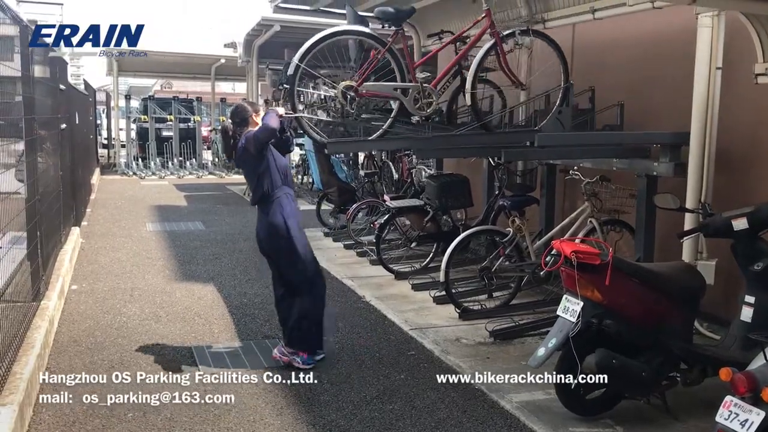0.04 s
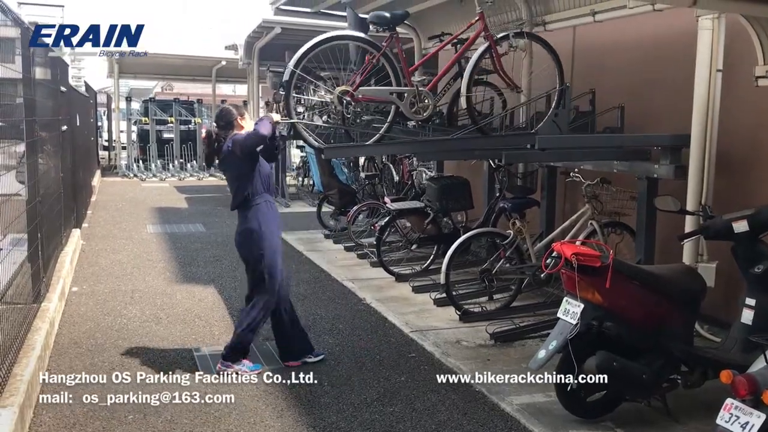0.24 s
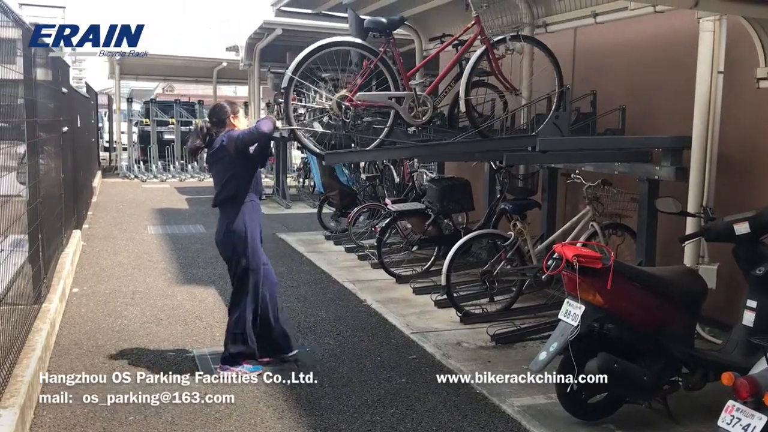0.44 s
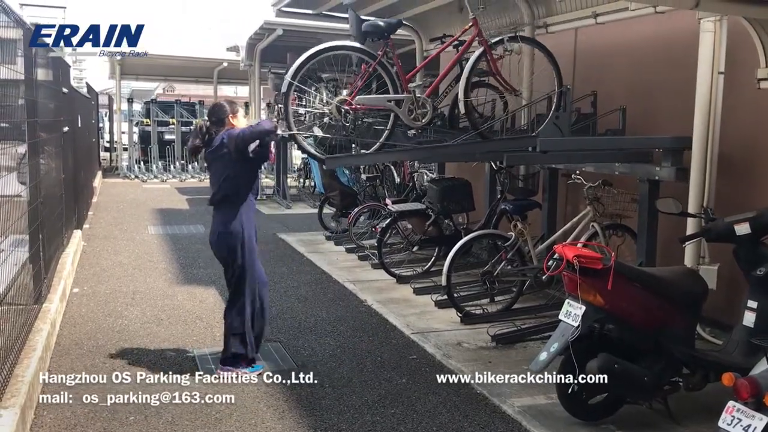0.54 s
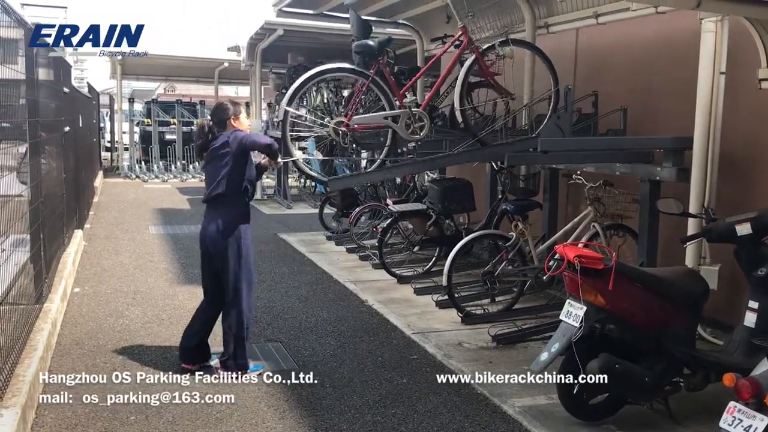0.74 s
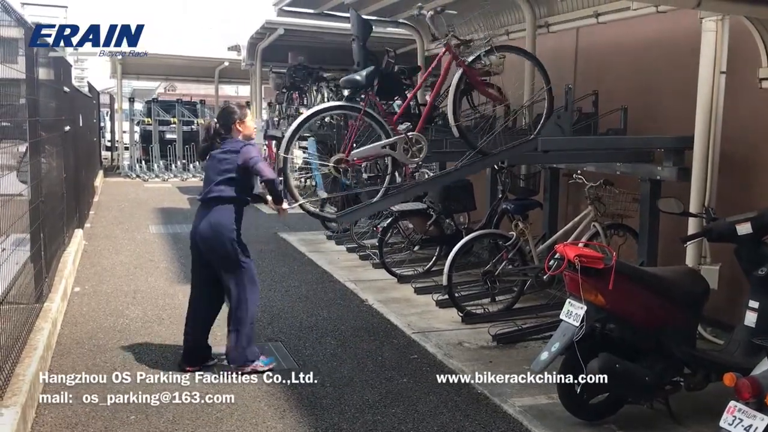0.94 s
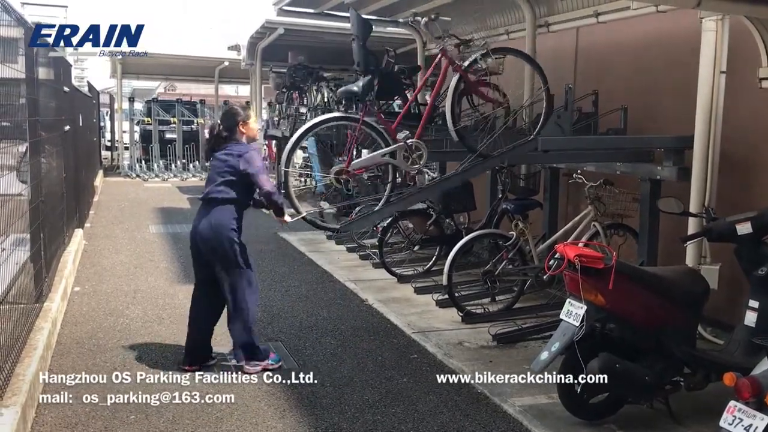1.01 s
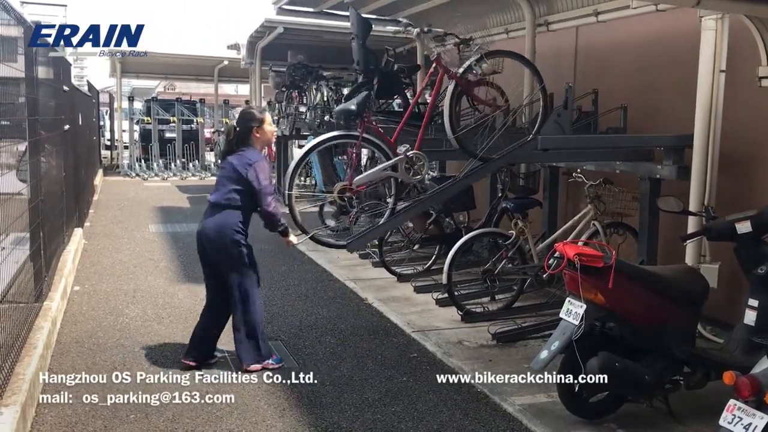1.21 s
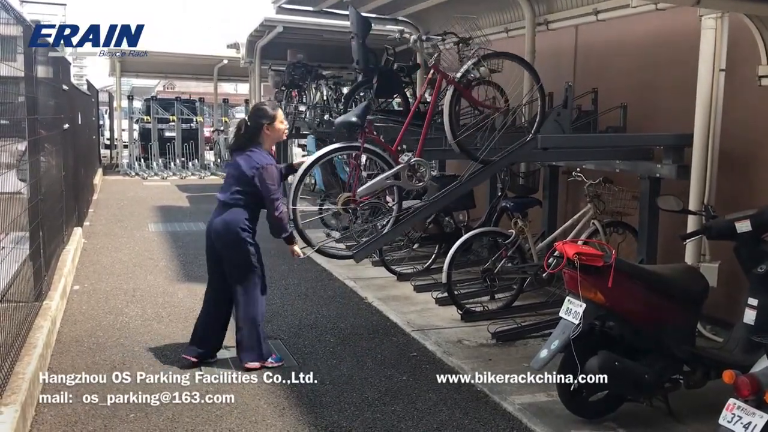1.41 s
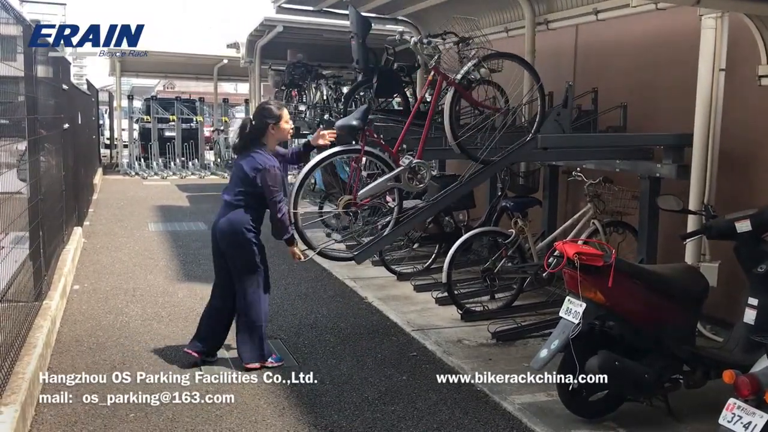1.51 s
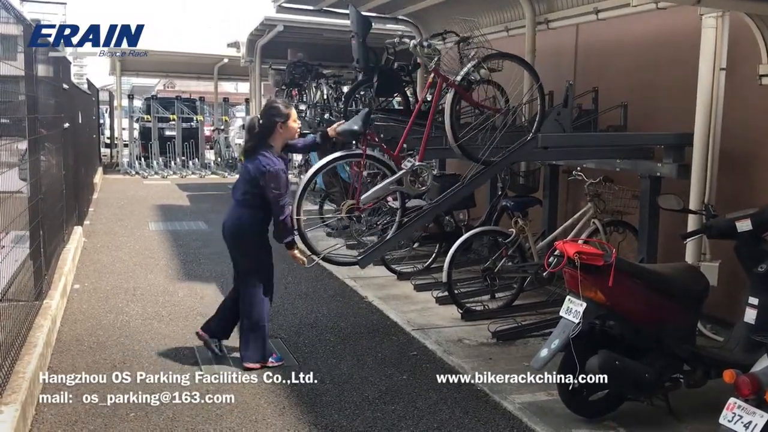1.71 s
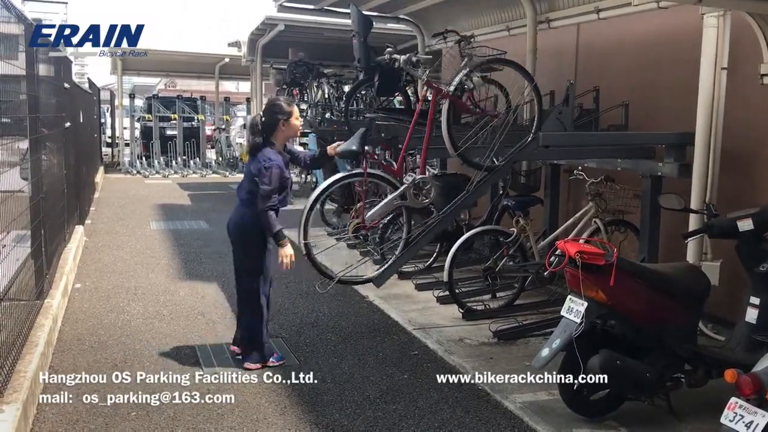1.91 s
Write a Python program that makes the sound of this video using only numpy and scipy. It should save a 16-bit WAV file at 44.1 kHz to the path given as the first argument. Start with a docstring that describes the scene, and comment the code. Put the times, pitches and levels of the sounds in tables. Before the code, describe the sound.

Loud metal clack and ringing rattle from a bicycle rack, followed by faint rolling and knocks.

```python
"""The upper tray of a steel bicycle rack slides out, hits its end stop with a loud clack and tilts down.
Its rollers grind along the rail; the blow and its rebounds set tray and bicycle rattling and ringing
under the shelter roof. Lighter knocks follow over a low town rumble. At the end a shoe scuffs the
gritty asphalt and something gives a thin squeak."""
import sys
import numpy as np
from scipy import signal
from scipy.fft import rfft, irfft
from scipy.io import wavfile
from scipy.ndimage import uniform_filter1d

SR = 44100
rng = np.random.default_rng(int(sys.argv[2]) if len(sys.argv) > 2 else 0)


def generate_wav(sig):
    """Save sig (samples, or channels by samples) to the path in sys.argv[1] as 16-bit PCM at SR."""
    pcm = np.round(np.clip(np.atleast_2d(sig).T, -1, 1) * 32767).astype(np.int16)
    wavfile.write(sys.argv[1], SR, pcm)


N = 85995
T = np.arange(N) / SR
HZ = np.fft.rfftfreq(N, 1 / SR)


def amp(db):
    """Decibels to gain."""
    return 10 ** (np.asarray(db) / 20)


def unit(x):
    """Scales to rms 1."""
    return x / np.sqrt(np.mean(x ** 2) + 1e-20)


def curve_at(points, hz):
    """Reads a curve on a log-frequency axis."""
    f, value = np.transpose(points)
    return np.interp(np.log(hz + 1), np.log(f + 1), value)


def colour(x, db):
    """EQ with a gain for each frequency, scaled to rms 1."""
    return unit(irfft(rfft(x) * amp(db), N))


def add(mix, s, sound):
    """Mixes a sound in at s seconds."""
    part = mix[max(round(s * SR), 0):]
    part += sound[:len(part)]


def drift(size):
    """Random wander smoothed over size points, rms 1."""
    return unit(uniform_filter1d(uniform_filter1d(rng.standard_normal(N), size), size))


def flat_noise():
    """Countless equally strong modes of random phase."""
    return unit(irfft(np.exp(2j * np.pi * rng.random(len(HZ))), N))


def die_away(x, t60s):
    """Lets each frequency decay at its own speed."""
    hz, t, spectra = signal.stft(x, SR, nperseg=256)
    decay = amp(-60 * t / curve_at(t60s, hz)[:, None])
    return signal.istft(spectra * decay, SR, nperseg=256)[1][:N]


def resonate(x, hz, width_hz):
    """Two resonators in series, both following the curve hz."""
    turn = np.exp(2j * np.pi * np.cumsum(hz) / SR)
    pole = np.exp(-np.pi * width_hz / SR)
    for _ in range(2):
        x = 2 * (turn * signal.lfilter([1 - pole], [1, -pole], x / turn)).real
    return x


# The town bed's tone. Each row: frequency in Hz, relative level in dB.
TOWN_EQ = [(20, -39), (35, -10.5), (62, 3), (110, 1), (180, -2), (220, -8.5), (400, -16.5), (650, -19),
           (1200, -24.5), (2300, -37.5), (3900, -31), (5200, -51), (7300, -42), (8400, -33), (10200, -48),
           (13500, -49), (16000, -44)]
# Hum and faint whine. Each row: pitch in Hz, level in dB.
MACHINE_TONES = [(180, -63), (266, -67.5), (6430, -87.5)]


def town(wash_db=-52, patchy_db=1.5, waver_hz=4):
    """Distant traffic rumbles and hisses in drifting patches; far machinery adds a wavering hum."""
    spectra = signal.stft(colour(flat_noise(), curve_at(TOWN_EQ, HZ)), nperseg=1024)[2]
    patches = unit(uniform_filter1d(uniform_filter1d(rng.standard_normal(spectra.shape), 10, 0), 10, 1))
    wash = unit(signal.istft(spectra * amp(patchy_db * patches), nperseg=1024)[1][:N])
    hum = np.zeros(N)
    for hz, db in MACHINE_TONES:
        pitch = hz + waver_hz * drift(size=2000)
        hum += amp(db) * np.sqrt(2) * np.sin(2 * np.pi * np.cumsum(pitch) / SR)
    return amp(wash_db) * wash + hum


# The rollers' fader ride. Each row: time in seconds, level in dB.
ROLLER_FADER = [(0, -57), (.06, -55), (.17, -59), (.23, -59), (.5, -61), (.85, -65), (1.0, -61),
                (1.13, -60), (1.24, -64.5), (1.52, -65.5), (1.95, -63.5)]
# The rail's tone. Each row: frequency in Hz, relative level in dB.
RAIL_EQ = [(150, -4.5), (500, 2.5), (1000, 2), (1800, -2.5), (3500, -9), (6000, -12.5), (10200, -22.5),
           (13000, -16), (16000, -29)]


def rollers(uneven_db=0.5):
    """Rollers grind unevenly along the rail."""
    grind = colour(flat_noise(), curve_at(RAIL_EQ, HZ))
    return grind * amp(np.interp(T, *np.transpose(ROLLER_FADER)) + uneven_db * drift(size=900))


def frame_resonances(ripple_db=1.7, cluster_db=4, width_hz=50):
    """The rack's uneven comb of resonances, in dB: they crowd around the tray's strongest modes."""
    clusters = np.max([np.exp(-.5 * ((HZ - hz) / width_hz) ** 2) for hz, _, _ in TRAY_MODES], axis=0)
    ripple = ripple_db * drift(size=90)[:len(HZ)]
    return (ripple + cluster_db * (clusters - .5)) * np.clip(HZ / 2500, 0, 1)  # flatter in the bass


# Knocks of latch, tray, bicycle and shoes.
# Each row: start in seconds, level in dB, centre in Hz, spread in octaves, T60 in seconds.
KNOCK_CUES = [(.074, -47, 854, 0.34, 0.17), (.074, -51, 3880, 0.92, 0.18), (0.074, -54, 4500, 0.037, 0.16),
              (.115, -52.5, 1490, 1.7, 0.48), (.158, -57.5, 6600, 0.83, 0.61),
              (0.23, -39, 13000, 0.45, 0.05), (0.2326, -25.5, 1095, 0.53, 0.063),
              (.755, -55.5, 1210, 0.46, 0.43), (.91, -57.5, 1090, 0.54, 0.67),
              (1.16, -54, 1060, 0.46, 0.25), (1.362, -50.5, 900, 0.29, 0.096),
              (1.365, -53, 3030, 0.54, 0.085), (1.366, -63, 4690, 0.04, 0.07),
              (1.384, -57, 2320, 0.21, 0.12), (1.708, -53.5, 1030, 0.67, 0.12),
              (1.711, -56, 1770, 0.18, 0.14)]


def knocks(frame_db, rise_s=0.002, skirt_db=-30):
    """Each short knock rings one region of the frame's modes."""
    out = np.zeros(N)
    for s, db, hz, spread, t60 in KNOCK_CUES:
        region = np.exp(-.5 * (np.log2((HZ + 1) / hz) / spread) ** 2)
        skirt = amp(skirt_db) / (1 + HZ / hz) * HZ / (HZ + 200)
        ring = colour(flat_noise(), frame_db + 20 * np.log10(region + skirt + 1e-6))
        envelope = np.minimum(T / rise_s, 1) * amp(-60 * T / t60)
        add(out, s, amp(db) * envelope * ring)
    return out


# The reverb's length. Each row: frequency in Hz, T60 in seconds.
ROOF_DECAY = [(100, 0.69), (400, 2.33), (1100, 1.34), (4000, 0.73), (15000, 0.36)]


def shelter_reverb(x, predelay_s=0.0066):
    """Reflections under the roof fade in after a short gap and linger longest in the low mids."""
    tail = die_away(flat_noise(), ROOF_DECAY) * np.clip(T / predelay_s - 1, 0, 1)
    return signal.fftconvolve(x, tail / np.linalg.norm(tail))[:N]


# The tray hits its stop and rebounds.
# Each row: start in seconds, level in dB, brightness in dB per octave about the pivot.
STOP_HITS = [(0.2289, -38, 1.5), (.234, -33, -2), (.239, -28, 0), (0.2464, -29, 0.5), (.261, -33, 0.5),
             (.270, -33.5, -0.5), (.299, -36, 5), (.321, -35, 2.5), (.348, -39, 0.5), (0.386, -41.5, -1.5),
             (.409, -39.5, 1)]
PIVOT_HZ = 1490
# The steel frame's dense ring. Each row: frequency in Hz, relative level in dB.
STEEL_EQ = [(30, -32), (70, -5.5), (300, -6.5), (500, -4), (800, -1), (1200, 0.5), (2300, -4.5),
            (3200, -6.5), (4400, -7), (5300, -12), (6300, -9), (7700, -19), (9000, -14.5), (10300, -24),
            (14000, -22.5), (16000, -42)]
# That ring's length. Each row: frequency in Hz, T60 in seconds.
STEEL_DECAY = [(100, 0.47), (400, 0.56), (1200, 0.37), (3000, 0.31), (15000, 0.21)]


def clack(frame_db, treble_rise_s=0.0023, bass_rise_s=0.017, crossover_hz=663):
    """Each hit on the end stop spreads through the frame, treble first, and rings out."""
    out = np.zeros(N)
    octaves = np.log2(np.maximum(HZ, 300) / PIVOT_HZ)
    for s, db, brightness in STOP_HITS:
        tone_db = curve_at(STEEL_EQ, HZ) + frame_db + brightness * octaves
        ring = die_away(colour(flat_noise(), tone_db), STEEL_DECAY)
        bass = signal.sosfiltfilt(signal.butter(2, crossover_hz, fs=SR, output="sos"), ring)
        snap = np.minimum(T / treble_rise_s, 1) * (ring - bass)
        bloom = np.minimum(T / bass_rise_s, 1) * bass
        add(out, s, amp(db) * (snap + bloom))
    return out


# The tray's strongest modes. Each row: pitch in Hz, relative level in dB, T60 in seconds.
TRAY_MODES = [(388, .5, .7), (414, -10, 2.1), (439, -8, .9), (559, -9, .75), (595, -11.5, 2),
              (641, -13, 1.9), (674, -1, .5), (783, -3, .45), (838, -.5, .45), (981, -2, .52),
              (1044, -9, 1.5), (1085, -8, .8), (1182, 1, .5), (1261, -3, .45), (1366, -1, .45),
              (1533, -7, .62), (2119, -3, .36), (2650, -6.5, .46), (2789, -7, .42), (2817, -2, .45),
              (3661, -8, .31), (3818, -11, .45), (4658, -9, .3), (4819, -10, .42), (6432, -8.5, .33)]


def tray_ring(gain_db=-16.5, rise_s=.014, max_beat_hz=9, twin_gain=.3):
    """Every hit pours energy into the tray's modes, which ring on, each beating against a close twin."""
    out = np.zeros(N)
    for hz, mode_db, t60 in TRAY_MODES:
        envelope = np.minimum(T / rise_s, 1) * amp(-60 * T / t60)
        energy = np.zeros(N)
        for s, db, brightness in STOP_HITS:
            add(energy, s, (amp(db + brightness * np.log2(hz / PIVOT_HZ)) * envelope) ** 2)
        phase, twin_phase, detune = rng.random(size=3)
        mode = np.sin(2 * np.pi * (hz * T + phase))
        twin = np.sin(2 * np.pi * ((hz + max_beat_hz * detune) * T + twin_phase))
        out += amp(gain_db + mode_db) * np.sqrt(energy) * (mode + twin_gain * twin)
    return out


def guide_rub(start_s=1, length_s=0.19, db=-68.5, centre_hz=2760):
    """The tray rubs on its guide as it tilts down: one soft swell of friction noise."""
    progress = np.clip((T - start_s) / length_s, 0, 1)
    friction = unit(resonate(flat_noise(), np.full(N, centre_hz), width_hz=2300))
    return amp(db) * np.sin(np.pi * progress) * friction


def grit(grains_per_s=5000, spread_db=2):
    """Grit underfoot: dense tiny clicks of uneven size."""
    clicks = (rng.random(N) < grains_per_s / SR) * rng.choice([-1, 1], N)
    return unit(clicks * amp(spread_db * np.minimum(rng.exponential(1, N), 4)))


# The shoe's move. Each row: time in seconds, scrape level in dB, scrape centre in Hz, hiss level in dB.
SCUFF_MOVE = [(1.811, -76, 1000, -83), (1.845, -59.5, 1230, -66.5), (1.865, -60.5, 2800, -66),
              (1.889, -58.5, 2900, -64), (1.92, -72, 4130, -56.5), (1.95, -77, 6500, -65)]
# The grit's hiss. Each row: frequency in Hz, relative level in dB.
GRIT_EQ = [(4000, -12), (6500, -1.5), (9000, 0), (11000, 0), (14000, 5.5), (16000, -7)]


def shoe_scuff(low_cut_hz=700, rasp_db=3):
    """A sole drags over grit, catching and slipping; the rasp brightens as it goes."""
    s, scrape_db, centre_hz, hiss_db = np.transpose(SCUFF_MOVE)
    drag = signal.sosfilt(signal.butter(2, low_cut_hz, "high", fs=SR, output="sos"), grit())
    sweep = resonate(drag, np.interp(T, s, centre_hz), width_hz=1800)
    scrape = unit(sweep * amp(rasp_db * drift(size=120))) * amp(np.interp(T, s, scrape_db))
    hiss = colour(grit(), curve_at(GRIT_EQ, HZ)) * amp(np.interp(T, s, hiss_db))
    return (T > s[0]) * (scrape + hiss)


def squeak(start_s=1.926, length_s=0.022, db=-52.5, hz=8070, rise_hz=500, jitter_hz=121):
    """A short, thin squeak with a shaky, rising pitch."""
    progress = np.clip((T - start_s) / length_s, 0, 1)
    pitch = hz + rise_hz * progress + jitter_hz * drift(size=30)
    return amp(db) * np.sin(np.pi * progress ** 2) * np.sin(2 * np.pi * np.cumsum(pitch) / SR)


def scene(reverb_db=-14):
    """Mono mix: the close sounds feed the shelter's reverb; tray ring and town bed stay dry."""
    frame_db = frame_resonances()
    near = clack(frame_db) + knocks(frame_db) + rollers() + guide_rub() + shoe_scuff() + squeak()
    return (near + amp(reverb_db) * shelter_reverb(near) + tray_ring() + town())[None]


def record(dry):
    """A steep high cut at 15750 Hz on the whole mix."""
    high_cut = signal.firwin(511, 15750, window=("kaiser", 9), fs=SR)
    return signal.oaconvolve(dry, high_cut[None], "same")


dry = scene()
out = record(dry)
generate_wav(out)
```